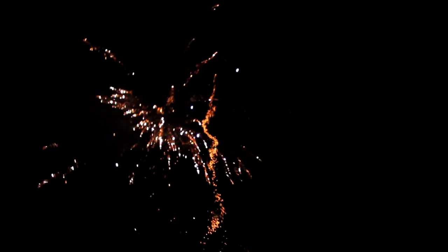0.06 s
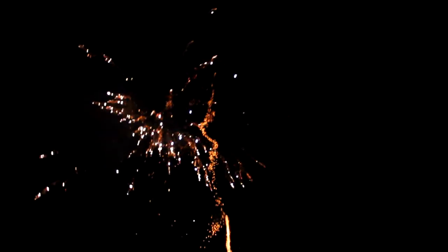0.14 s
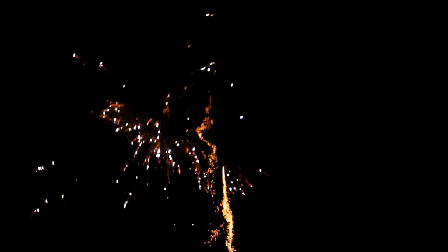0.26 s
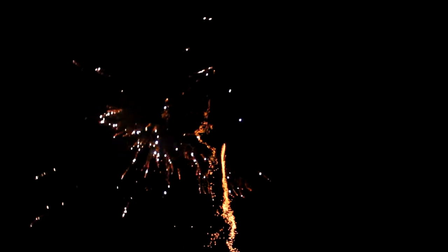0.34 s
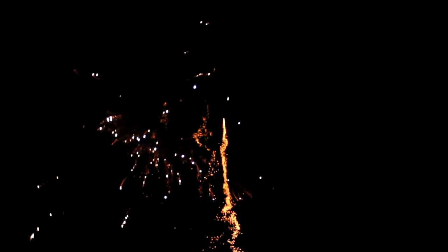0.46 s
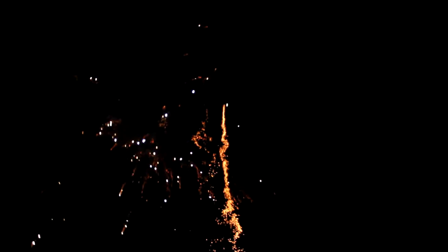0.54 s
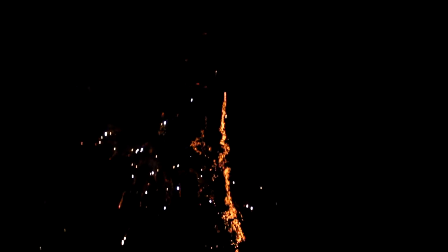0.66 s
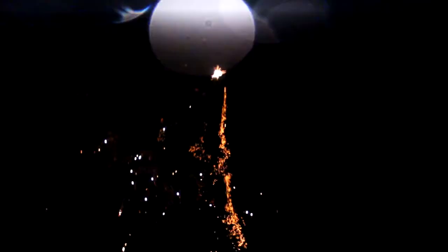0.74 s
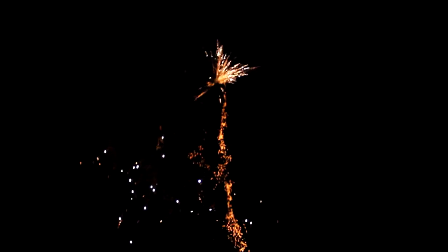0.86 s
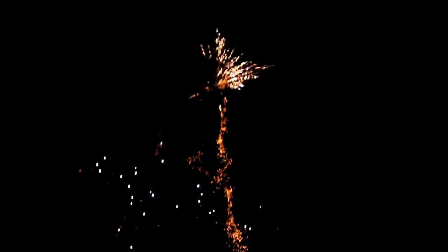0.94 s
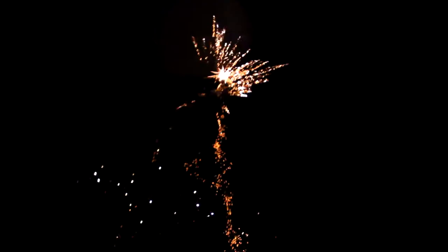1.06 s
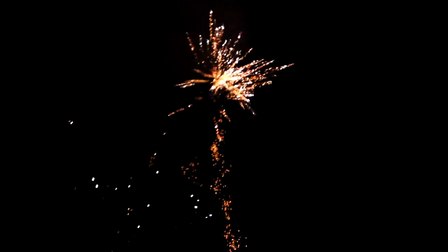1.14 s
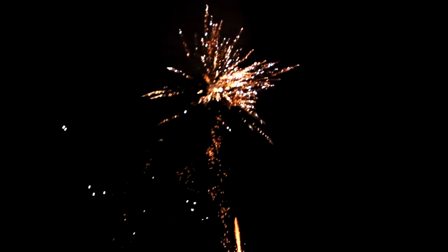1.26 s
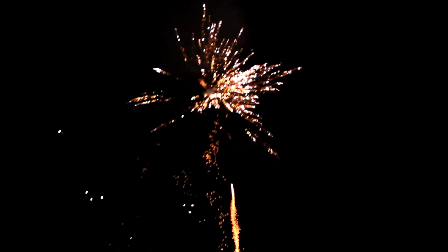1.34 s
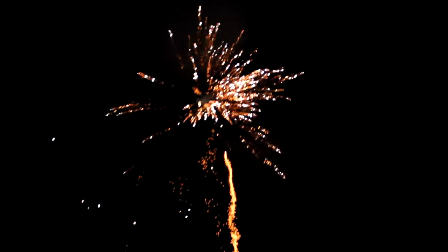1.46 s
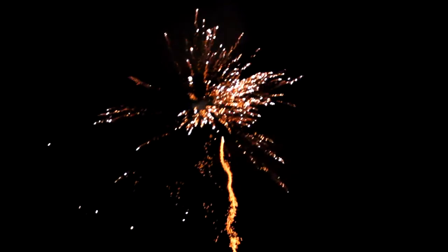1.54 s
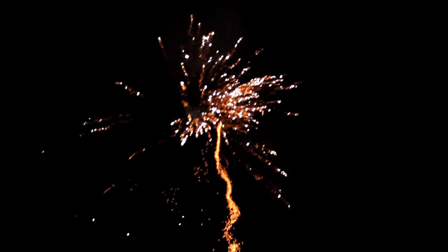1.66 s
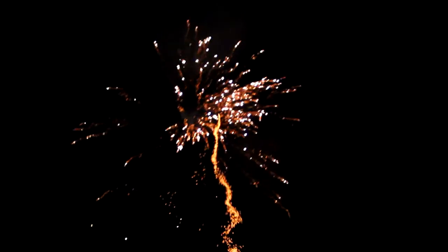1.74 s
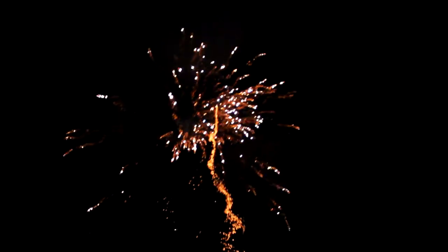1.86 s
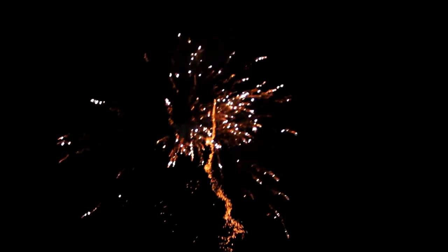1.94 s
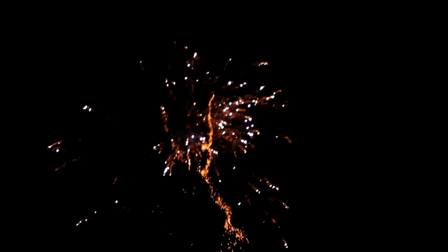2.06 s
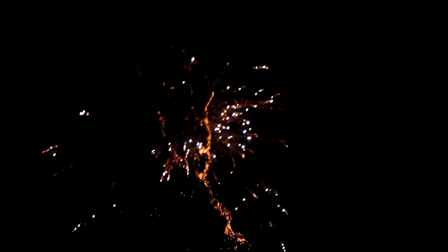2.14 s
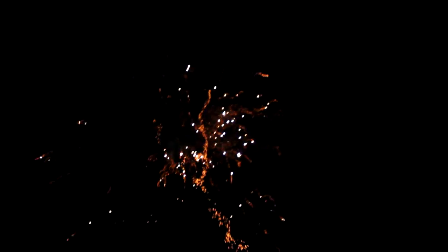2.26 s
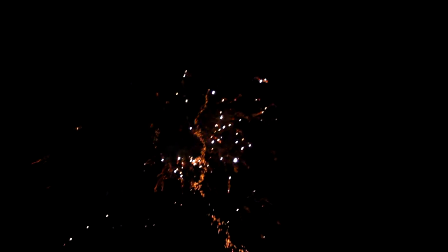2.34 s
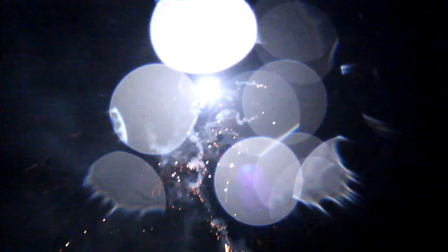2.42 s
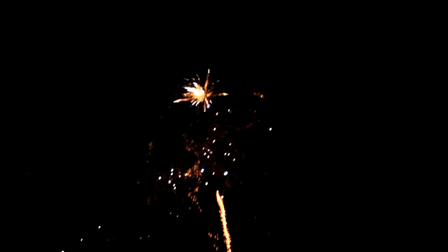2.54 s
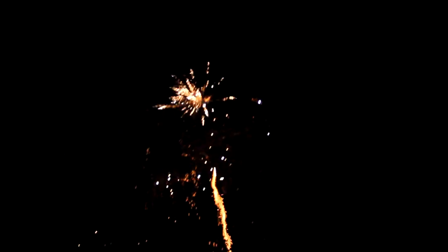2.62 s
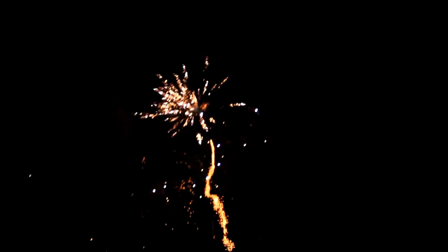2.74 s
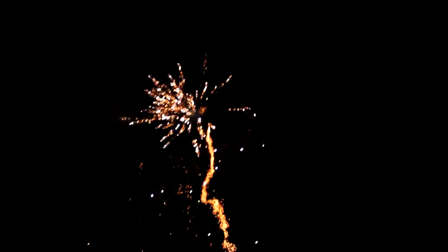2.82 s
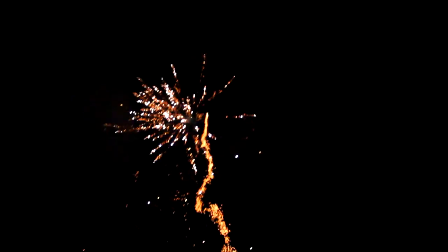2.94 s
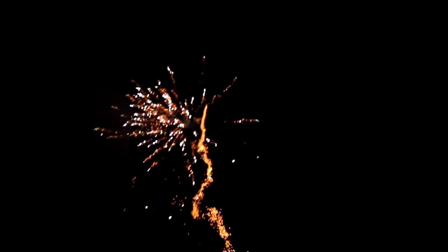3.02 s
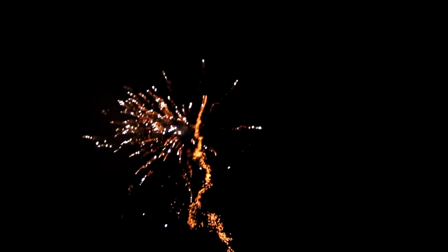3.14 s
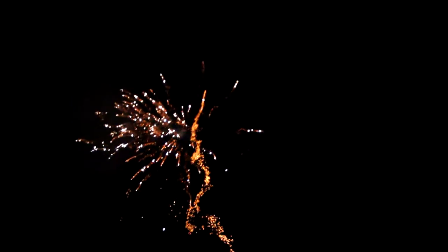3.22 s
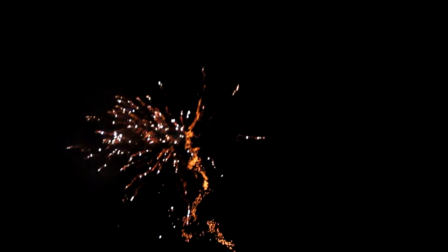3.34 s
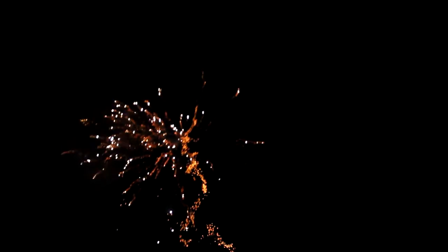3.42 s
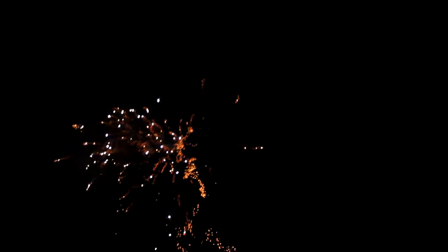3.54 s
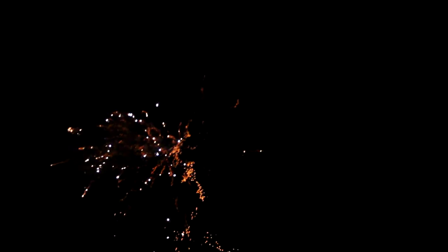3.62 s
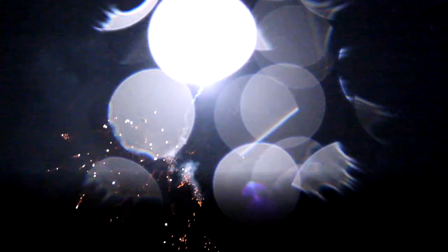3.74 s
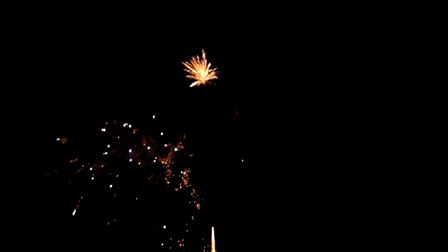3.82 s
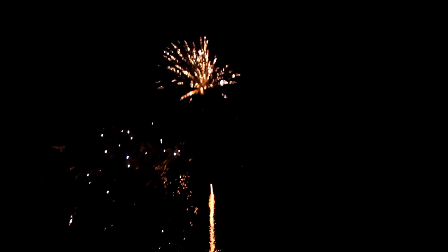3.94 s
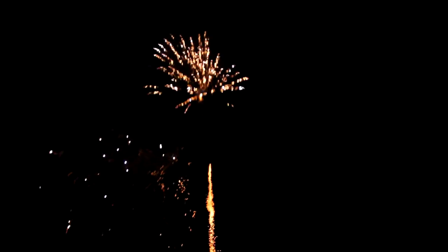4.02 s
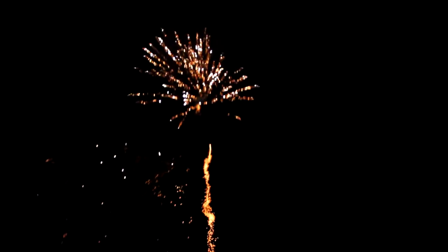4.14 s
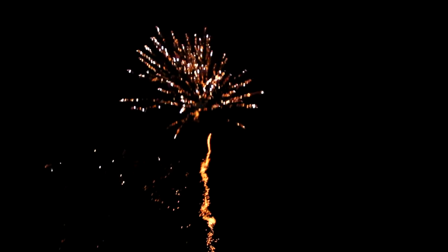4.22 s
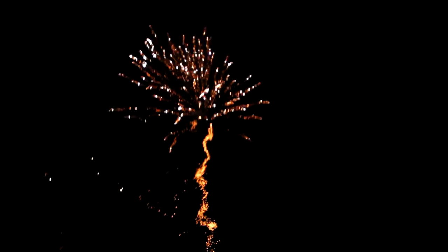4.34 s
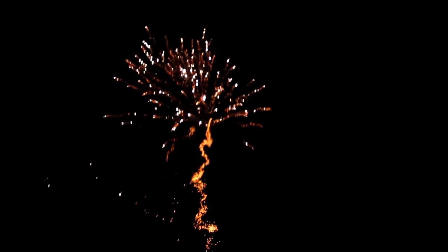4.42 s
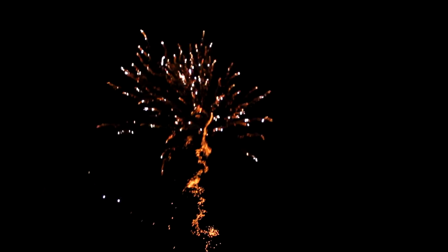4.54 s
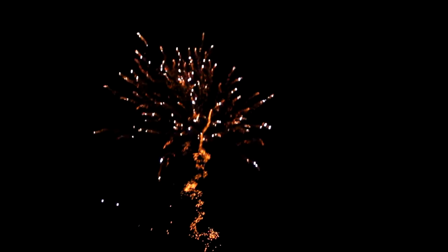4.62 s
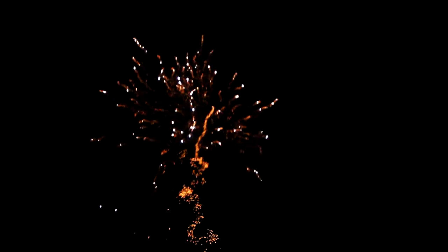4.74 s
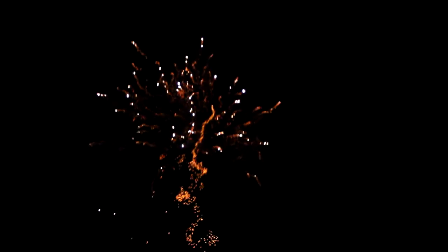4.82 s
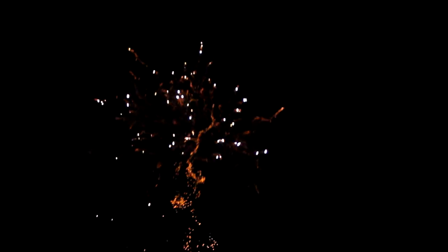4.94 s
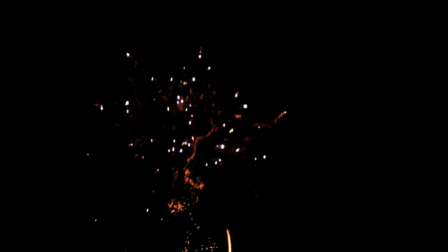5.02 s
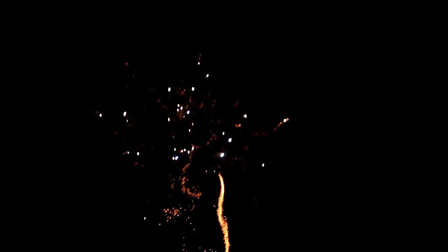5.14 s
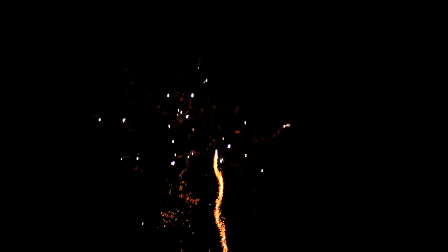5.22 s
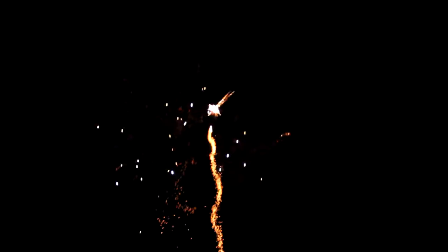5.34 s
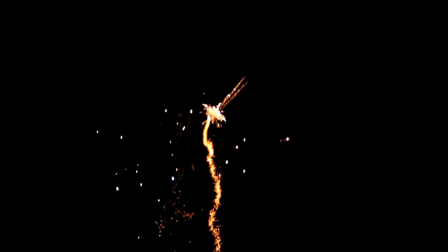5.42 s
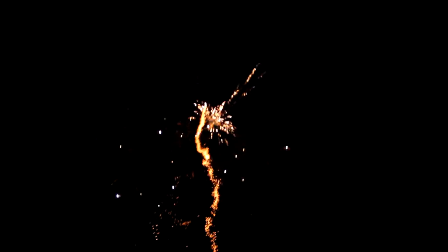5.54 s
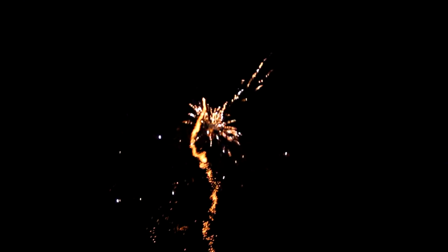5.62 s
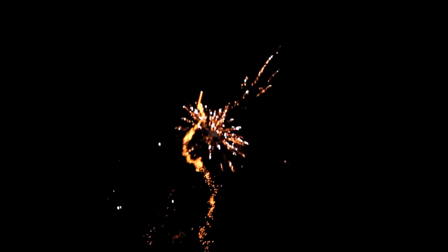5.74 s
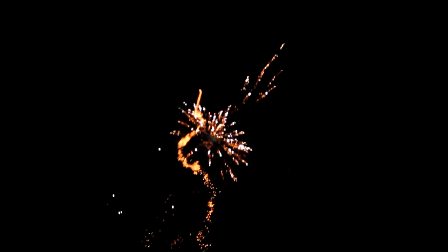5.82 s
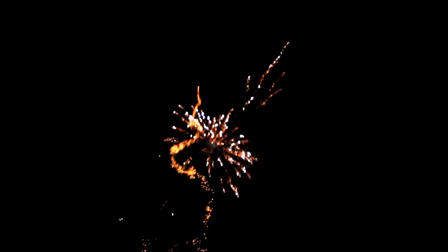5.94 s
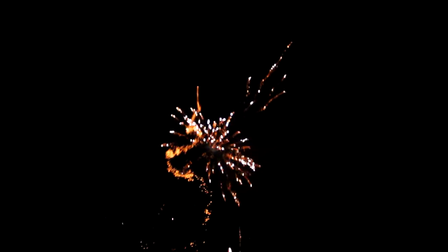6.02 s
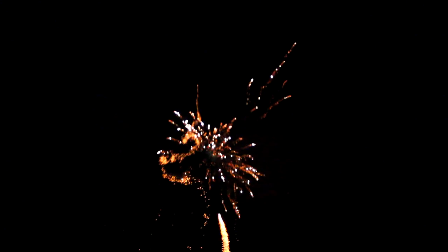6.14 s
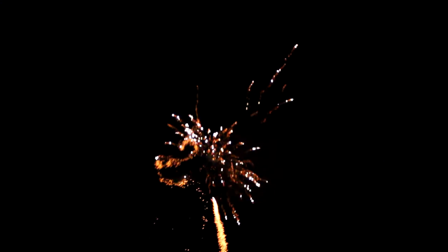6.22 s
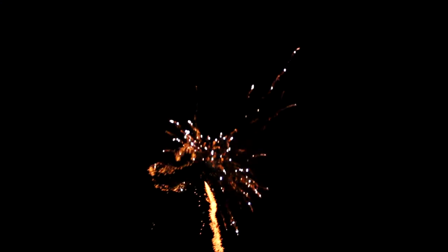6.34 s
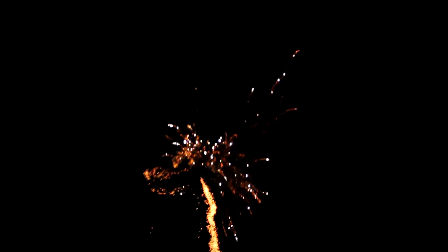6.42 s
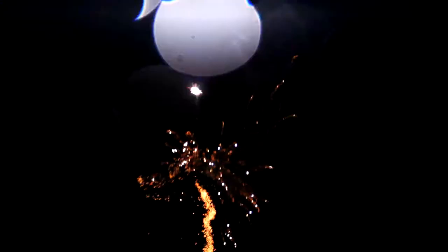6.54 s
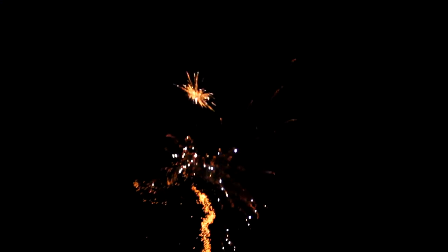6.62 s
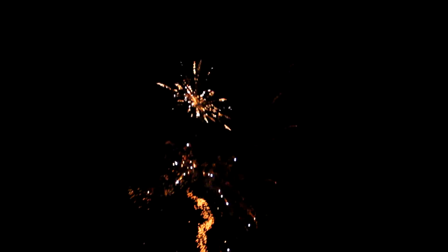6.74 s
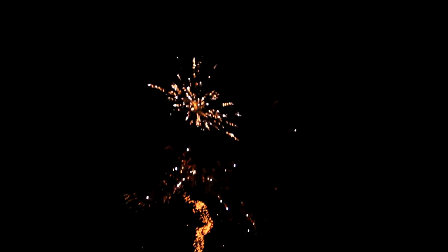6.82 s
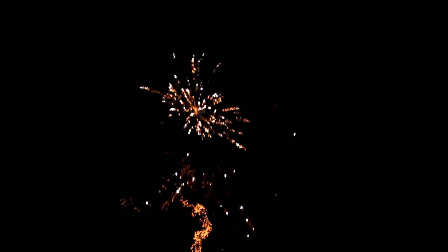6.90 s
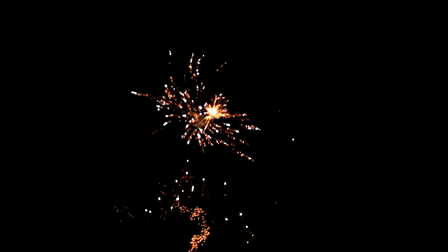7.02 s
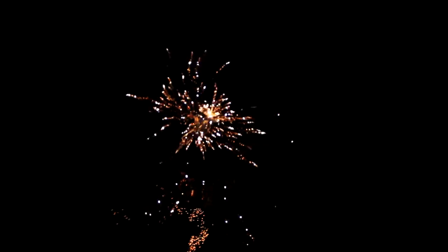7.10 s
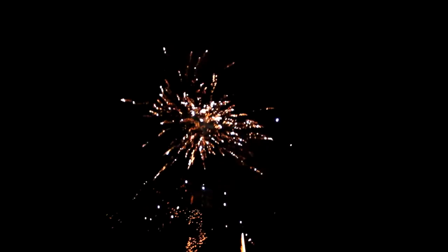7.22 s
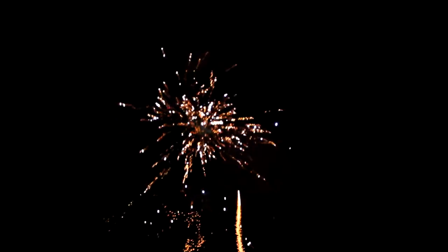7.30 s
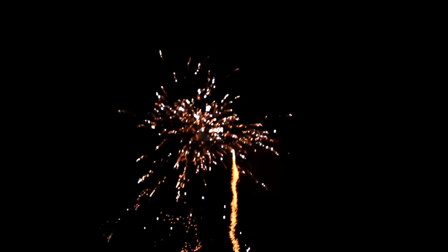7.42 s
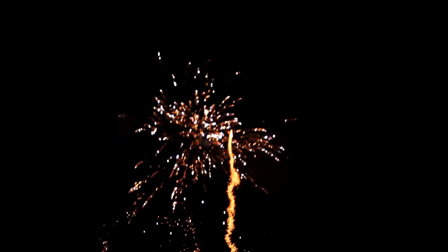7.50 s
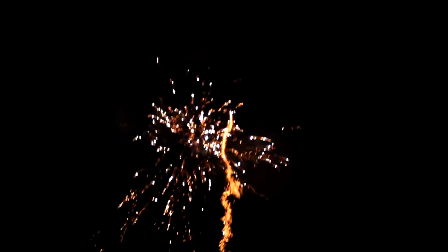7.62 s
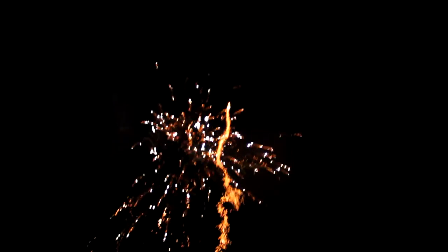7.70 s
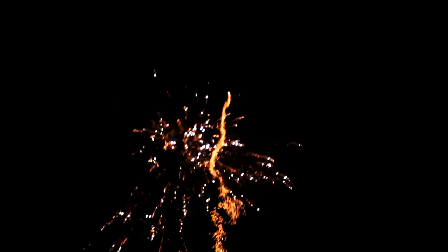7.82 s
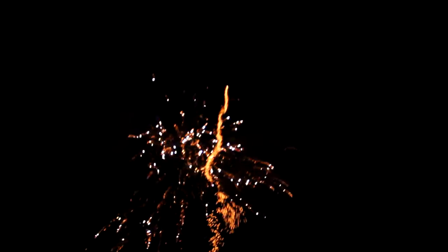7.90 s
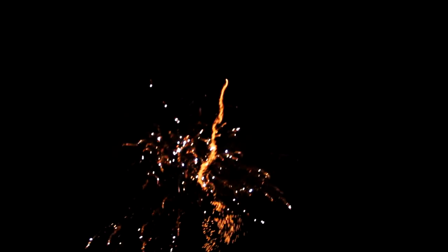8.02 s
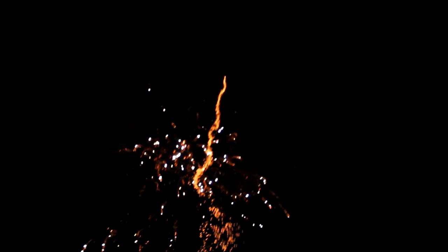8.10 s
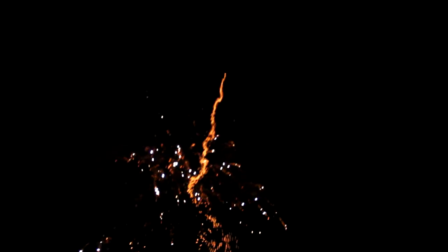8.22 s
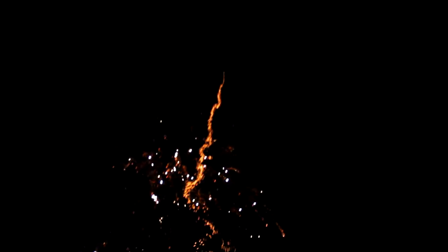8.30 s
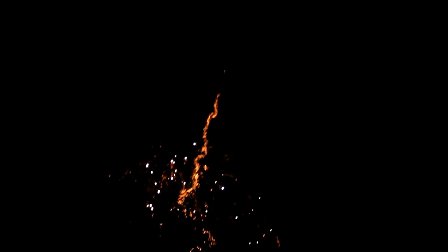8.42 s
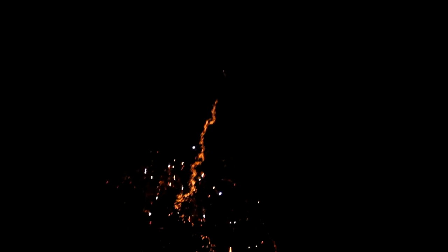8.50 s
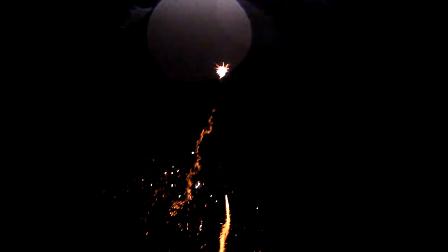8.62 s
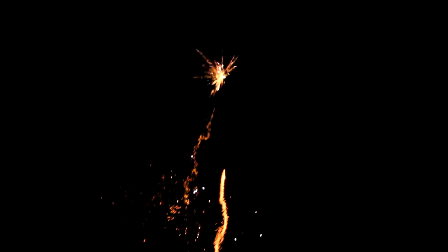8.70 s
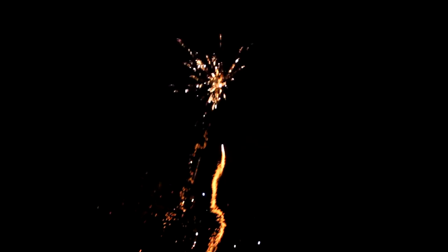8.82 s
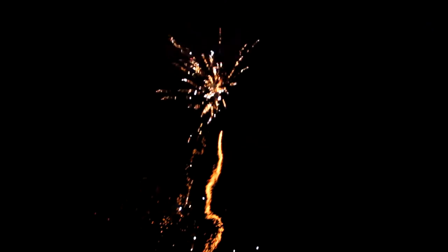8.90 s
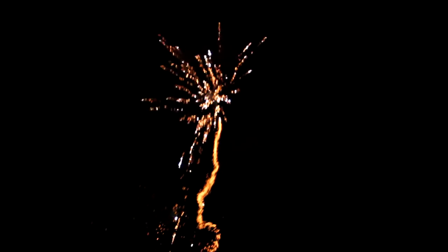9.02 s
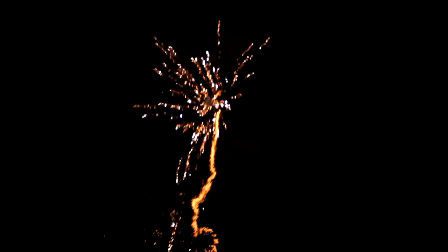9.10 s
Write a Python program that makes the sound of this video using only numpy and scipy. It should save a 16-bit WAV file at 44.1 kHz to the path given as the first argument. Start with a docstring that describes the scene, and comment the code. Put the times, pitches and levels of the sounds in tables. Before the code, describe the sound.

A multi-shot firework cake fires in the open at night. Launch charges thump out of the tubes and shells crack overhead about half a second later, giving a loud bang roughly every second. Between shots, flame rushes softly, sparks hiss and rising comets whoosh. Each bang echoes off houses and trees and fades in a long wash. The small, close microphone overloads on the bangs.

```python
"""A firework cake fires in the open at night: lift charges thump out of the tubes, shells crack overhead.
Around the bangs, flame rushes and roars, fuse sparks hiss, escaping gas whistles thinly,
spinning comets whoosh upward and single stars pop, all over a quiet bed of night air.
Ground and nearby walls double each shock; houses and trees send back echoes and a long wash.
The small microphone stands so close that it overloads on the bangs."""
import sys
import numpy as np
from scipy import signal
from scipy.fft import rfft, irfft, next_fast_len
from scipy.io import wavfile

SR = 44100
rng = np.random.default_rng(int(sys.argv[2]) if len(sys.argv) > 2 else 0)


def wav_out(sig):
    """Save sig, one row per channel (or a flat mono array), as 16-bit PCM at SR to the path in sys.argv[1]."""
    wavfile.write(sys.argv[1], SR, np.round(np.clip(np.atleast_2d(sig).T, -1, 1) * 32767).astype(np.int16))


N = 403956
TIME = np.arange(N) / SR
AGE = np.arange(2 ** 16) / SR  # seconds since an impulse
CLUTTER_DB = -3  # scatter off things on the ground, against the direct shock

# cue list of the lift charges: (time [s], shock level [dB], shock pitch [Hz], gas jet level [dB],
# jet decay [s], echo send [dB], flame level [dB], flame swell [s])
LIFT_CHARGES = [(-.1, 19, 378, -2.5, .006, 12.5, -32, 1.0), (1.0452, 4, 380, -4, 0.00088, 1.5, -33.5, 2.4),
                (2.2190, 22, 420, 2, 0.0056, 12, -33, .9),
                (3.5788, 20.5, 370, -0.5, 0.0071, 12.5, -29.5, 2.2),
                (4.832, 21.5, 310, 3.5, 0.0084, 11, -32.5, 1.1), (5.775, 7, 390, 0.5, .0016, 6, -37.5, 2.0),
                (7.0224, 14, 465, 2.5, 0.0023, 5, -32, 1.3), (8.3004, 23.5, 382, 3, 0.0079, 13, -25.5, .85)]


def undb(db):
    """Decibels to gain."""
    return 10 ** (np.asarray(db) / 20)


def unit(x):
    """Scale to rms 1."""
    return x / np.std(x)


def butter(x, hz, kind, order=2):
    """Causal low-pass or high-pass."""
    return signal.sosfilt(signal.butter(order, hz, kind, fs=SR, output="sos"), x)


def resonance(x, hz, width_hz):
    """Two-pole band-pass with gain 1 at its centre."""
    return signal.lfilter(*signal.iirpeak(hz, hz / width_hz, fs=SR), x)


def noise(spectrum):
    """Noise of rms 1, shaped by an EQ curve of (frequency [Hz], level [dB]) points."""
    hz, db = np.transpose(spectrum)
    white = rng.standard_normal(next_fast_len(N))
    bin_hz = np.maximum(np.fft.rfftfreq(len(white), 1 / SR), 1)
    gain = undb(np.interp(np.log(bin_hz), np.log(hz), db))
    return unit(irfft(rfft(white) * gain, len(white))[:N])


def wobble(rate):
    """Random modulation of spread 1 that glides to a new value rate times a second."""
    return unit(np.interp(TIME * rate, np.arange(2 ** 14), rng.standard_normal(2 ** 14)))


def add(track, s, sound):
    """Mix a sound into the track at time s."""
    start = int(round(s * SR))
    part = sound[max(-start, 0):max(len(track) - start, 0)]
    track[max(start, 0):max(start, 0) + len(part)] += part


def scatter(decay_s):
    """A fading cluster of tiny reflections, of energy 1."""
    age = AGE[:len(AGE) // 4]
    cluster = rng.standard_normal(len(age)) * np.exp(-age / decay_s)
    return cluster / np.linalg.norm(cluster)


def night_air():
    """A quiet, steady bed of outdoor noise, strongest in the mids."""
    # tone of the bed: (frequency [Hz], level [dB])
    night_spectrum = [(15, -74), (25, -43), (70, -18.5), (118, -24), (141, -8), (291, -14.5), (367, -21),
                      (541, -9), (682, -1.5), (930, -7.5), (2750, -19.5), (12000, -48.5), (15600, -79),
                      (22000, -120)]
    return noise(night_spectrum) * undb(-42)


def gas_whistles():
    """Gas squeezing through a narrow gap sings a thin, unsteady note."""
    # one glide per whistle, each a list of (time [s], pitch [Hz], level [dB])
    glides = [
        [(1.86, 7840, -70), (1.95, 9000, -66), (2.06, 9050, -62), (2.21, 7600, -53)],
        [(8.08, 4120, -62), (8.15, 4250, -49), (8.22, 4060, -43), (8.3, 3870, -49)],
    ]
    out = np.zeros(N)
    for glide in glides:
        s, hz, db = np.transpose(glide)
        pitch = np.interp(TIME, s, hz) * (1 + .032 * wobble(1700))
        envelope = undb(np.interp(TIME, s, db)) * (TIME > s[0]) * (TIME < s[-1])
        out += envelope * np.sin(2 * np.pi * np.cumsum(pitch) / SR)
    return out


def comet_whooshes():
    """A spinning comet swells and fades with a hollow, fluttering note of air."""
    # comets in flight: (start [s], end [s], band centre [Hz], level [dB])
    flights = [(0.525, 0.946, 656, -32), (2.837, 3.72, 570, -46.5), (3.888, 4.85, 870, -37),
               (6.42, 7.34, 990, -36.5), (7.973, 8.394, 990, -34), (8.8, 9.305, 920, -36.5)]
    out = np.zeros(N)
    for start, end, hz, db in flights:
        air = resonance(resonance(rng.standard_normal(N), hz, 0.88 * hz), hz, 0.88 * hz)
        progress = np.clip((TIME - start) / (end - start), 0, 1)
        swell = np.sqrt(np.abs(np.sin(np.pi * progress)))
        out += undb(db) * swell * unit(air)
    return out * undb(1.5 * wobble(35))


def flare(s, swell_s, hold_s, growth, fade_db_per_s):
    """Envelope of a fire that swells to 1 at time s, holds, then dies away."""
    swell = np.clip(1 + (TIME - s) / swell_s, 0, 1) ** growth
    return swell * undb(-fade_db_per_s * np.maximum(TIME - s - hold_s, 0))


def flame_and_sparks():
    """Turbulent flame swells before each shot and leaves with the comet; the fuse sputters sparks."""
    # midrange rush of the flame: (frequency [Hz], level [dB])
    rush_spectrum = [(59, -60), (100, -26), (162, -13), (360, -5.5), (393, -2.5), (495, -2.5), (682, -5.5),
                     (875, -4.5), (1290, -10), (1600, -12), (3630, -25), (4030, -28), (4490, -30.5),
                     (7000, -44), (9100, -74.5), (15400, -120)]
    # bass roar under it: (frequency [Hz], level [dB])
    roar_spectrum = [(30, -4), (110, -5), (220, -3.5), (420, 1), (700, -21), (2000, -18), (8000, -65)]
    # bright hiss of sparks: (frequency [Hz], level [dB])
    hiss_spectrum = [(1500, -9), (3500, -11), (6000, 0.5), (9000, -3), (12000, -5.5), (16000, -9)]
    # spark sprays from the fuse: (peak time [s], swell [s], hold [s], level [dB])
    sprays = [(.86, .42, 0.24, -52), (2.21, 0.47, .02, -53.5), (3.6, 0.6, 0.18, -58),
              (4.82, 0.45, .03, -54.5), (5.436, 0.36, .02, -56.5), (6.368, 0.33, .03, -53.5),
              (7.847, 0.26, 0.4, -56), (8.85, .3, 0.044, -63)]
    flame_power = undb(-49) ** 2  # embers smoulder between shots
    full_burn_s = 0.046  # the flame holds at full strength just before the shot
    for s, *_, db, swell_s in LIFT_CHARGES:
        flame = flare(s - full_burn_s, swell_s, full_burn_s, growth=1.51, fade_db_per_s=21.5)
        flame_power = flame_power + (undb(db) * flame) ** 2
    spark_power = flame_power * undb(-35.5) ** 2  # the flame carries sparks of its own
    for s, swell_s, hold_s, db in sprays:
        spray = flare(s, swell_s, hold_s, growth=1.44, fade_db_per_s=43)
        spark_power = spark_power + (undb(db) * spray) ** 2
    rush_db, hiss_db = 10 * np.log10(flame_power), 10 * np.log10(spark_power)
    roar_db = 8 + 1.89 * rush_db  # a harder flame roars lower: the bass grows faster than the rush
    rush = noise(rush_spectrum) * undb(rush_db + 2.0 * wobble(45))
    flutter_db = 3 * wobble(30)
    roar = noise(roar_spectrum) * undb(roar_db + flutter_db)
    hiss = noise(hiss_spectrum) * undb(hiss_db + 1.1 * wobble(280))
    return rush + roar + butter(hiss, 1500, "high")


def star_pops():
    """Single stars go off with a small, scattered snap, dulled by distance."""
    # pops of burning stars: (time [s], peak level [dB], pitch [Hz])
    pops = [(.57, -23.5, 1450), (1.379, -44, 8000), (2.19, -17, 514), (3.012, -18.5, 2320),
            (6.454, -20.5, 600), (6.576, -33, 5100)]
    out = np.zeros(N)
    for s, db, hz in pops:
        snap = resonance(resonance(scatter(0.0046), hz, .5 * hz), hz, .5 * hz)
        add(out, s, undb(db) * snap / np.abs(snap).max())
    return out


def far_path(echoes, wash_db, dull_hz):
    """Reverb tail: dull, ragged echoes from houses over a patchy wash whose treble dies first."""
    # wash from trees and fences: (band [Hz], level [dB], time to fall 60 dB [s])
    wash_bands = [(105, -38, 2.2), (188, -2.5, 2.27), (285, -43.5, 2), (795, -22, 2.3), (2090, -4.5, 2.47),
                  (4010, -4.5, 1.46), (8400, -7.5, 0.67), (14900, -9, 0.3)]
    path = np.zeros(len(AGE))
    for s, db, smear_s in echoes:
        add(path, s, undb([db - 7]))  # the hard edge of the echo
        add(path, s, undb(db) * scatter(smear_s))
    path = butter(path, dull_hz, "low")
    spectrum = rfft(rng.standard_normal(len(AGE)))
    log_hz = np.log(np.fft.rfftfreq(len(AGE), 1 / SR) + 1)
    log_centres = np.log([hz for hz, *_ in wash_bands])
    # long waves come back in lumps from big things, short waves evenly from leaves
    lumps_db = 3.5 * wobble(70)[:len(AGE)]
    for solo, (hz, db, t60) in zip(np.eye(len(wash_bands)), wash_bands):
        band = irfft(spectrum * np.interp(log_hz, log_centres, solo, left=0))
        attack = 1 - np.exp(-AGE * (1 + hz / 700) / 0.048)  # the lows come late
        fade = np.log(1000) / t60
        decay = np.sqrt(2 * fade / SR) * np.exp(-fade * AGE)  # energy 1 at any length
        path += undb(db + wash_db + lumps_db / (1 + hz / 2500)) * band * attack * decay
    return path


def near_path(reflections, clutter_s, dull_hz):
    """The direct sound, then duller early reflections and scatter from clutter on the ground."""
    path = np.zeros(len(AGE))
    # small things scatter little of the long waves
    add(path, .002, undb(CLUTTER_DB) * butter(scatter(clutter_s), 240, "high", order=1))
    for ms, db in reflections:
        add(path, ms / 1000, undb([db]))
    path = butter(path, dull_hz, "low", order=1)
    path[0] += 1
    return path


def shock(hz, damping):
    """A blast wave: a sheer pressure front, then suction and a small rebound."""
    phase = 2 * np.pi * hz * AGE[:SR // 20]
    return np.exp(-damping * phase) * (np.cos(phase) - damping * np.sin(phase))


def wall_slaps():
    """Bursts slap back off a tall wall, sooner or later as each shell stands in the sky."""
    # slapbacks: (time [s], level [dB])
    slaps = [(0.9323, 5.5), (2.6264, -10), (3.92, -23), (5.5006, 1.5), (6.7340, 2), (7.1344, -15),
             (8.7879, -27)]
    # early reflections of a slap off nearby hard surfaces: (delay [ms], level [dB])
    reflections = [(1.7, -4), (5.0, 2), (6.8, -34)]
    out = np.zeros(N)
    for s, db in slaps:
        near = butter(near_path(reflections, clutter_s=0.016, dull_hz=6000), 4400, "low")
        add(out, s, undb(db) * signal.fftconvolve(near, shock(540, damping=0.7)))
    return out


def shell_bursts():
    """Each shell cracks overhead; its shock comes down on the ground and echoes off the houses."""
    # bursts: (time [s], shock level [dB], shock pitch [Hz], echo send [dB], house echo trim [dB])
    shells = [(0.8808, 26.5, 545, 10.5, -4), (1.1621, 5, 665, 2, -8), (2.5732, 21, 529, 10.5, -1),
              (3.8757, 19, 554, 10.5, -4), (5.4523, 22, 680, 9, 1.5), (6.6843, 25.5, 605, 11.5, -3),
              (7.082, 11, 634, 4, -1), (8.7438, 21, 550, 9.5, -1.5)]
    # early reflections of a burst off nearby hard surfaces: (delay [ms], level [dB])
    reflections = [(1.7, 2.5), (9.5, -12.5), (11.2, -23), (13.1, -14), (15.1, -13)]
    # echoes of a burst off house fronts: (delay [s], level [dB], smear [s])
    house_echoes = [(.056, -11.5, 0.023), (.137, -19.5, 0.014), (.191, -17.5, 0.0035),
                    (.197, -15.5, 0.0013), (.220, -19.5, .006), (.339, -18.5, 0.021)]
    out = np.zeros(N)
    for s, db, hz, send_db, trim_db in shells:
        crack = shock(hz, damping=0.59)
        # the casing tears in the first milliseconds and roughens the front
        crack += undb(-24) * rng.standard_normal(len(crack)) * np.exp(-AGE[:len(crack)] / 0.002)
        near = near_path(reflections, clutter_s=0.011, dull_hz=3530)
        add(out, s, undb(db) * butter(signal.fftconvolve(near, crack), 100, "high", order=1))
        # how well the houses face the shell depends on where it opens
        echoes = np.array(house_echoes) + [0, trim_db, 0]
        far = far_path(echoes, wash_db=-3.0, dull_hz=2630)
        add(out, s, undb(send_db) * signal.fftconvolve(far, shock(hz, damping=0.52)))
    return out


def lift_thumps():
    """Each lift charge thumps and spits a jet of gas as the shell clears the tube mouth."""
    # early reflections of a thump off nearby hard surfaces: (delay [ms], level [dB])
    reflections = [(1.9, -2.5), (5.2, 2), (7.0, -12), (18.8, -19.5), (23.8, -22)]
    # echoes of a thump off house fronts: (delay [s], level [dB], smear [s])
    house_echoes = [(.0738, -16, 0.0017), (.0792, -11, .003), (.102, -19.5, 0.0028), (.139, -22, 0.0095),
                    (.147, -20, .005), (.217, -21, .006), (.250, -25.5, 0.0047), (.283, -28.5, 0.0092)]
    leak_s = 0.0034  # gas leaks past the shell just before it leaves
    out = np.zeros(N)
    for s, db, hz, jet_db, jet_s, send_db, *_ in LIFT_CHARGES:
        near = near_path(reflections, clutter_s=0.01, dull_hz=5000)
        far = far_path(house_echoes, wash_db=1.5, dull_hz=5000)
        add(out, s, signal.fftconvolve(undb(db) * near + undb(send_db) * far, shock(hz, damping=0.66)))
        gas = unit(butter(rng.standard_normal(len(AGE)), 4200, "low", order=1))
        add(out, s, undb(jet_db) * gas * np.exp(-AGE / jet_s))
        add(out, s - leak_s, undb(db - 43.5) * gas[-int(leak_s * SR):])
    return out


def scene():
    """Mono mix of bangs and flame over the night air."""
    bed = night_air()
    bangs = lift_thumps() + shell_bursts() + wall_slaps() + star_pops()
    fire = flame_and_sparks() + comet_whooshes() + gas_whistles()
    return (bed + bangs + fire)[None]


def record(dry):
    """The microphone colours and sheds the bass, clips hard on the bangs and cuts the top."""
    # bumps and dips of the microphone in its case: (centre [Hz], width [Hz], gain [dB])
    case_eq = [(144, 74, -5.5), (201, 85, 0.5), (378, 63.7, -1), (450.5, 74, 2)]
    for hz, width_hz, db in case_eq:
        dry = dry + (undb(db) - 1) * resonance(dry, hz, width_hz)
    clipped = np.clip(butter(dry, 95, "high"), -1, 1)
    high_cut = signal.ellip(8, .2, 60, 16000, fs=SR, output="sos")
    return signal.sosfilt(high_cut, clipped)


dry = scene()
out = record(dry)
wav_out(out)
```